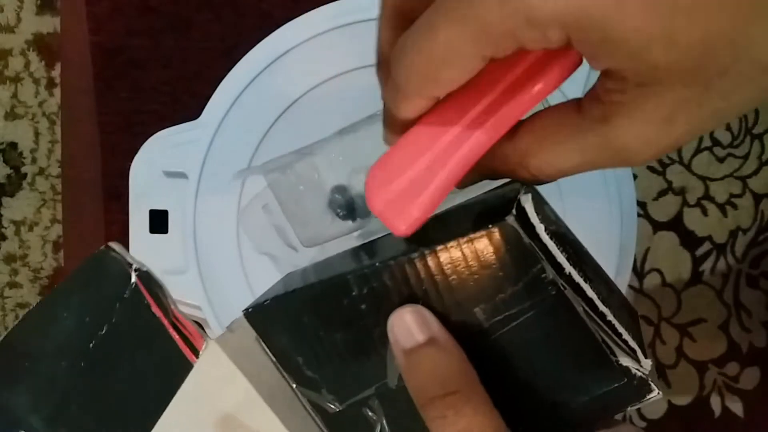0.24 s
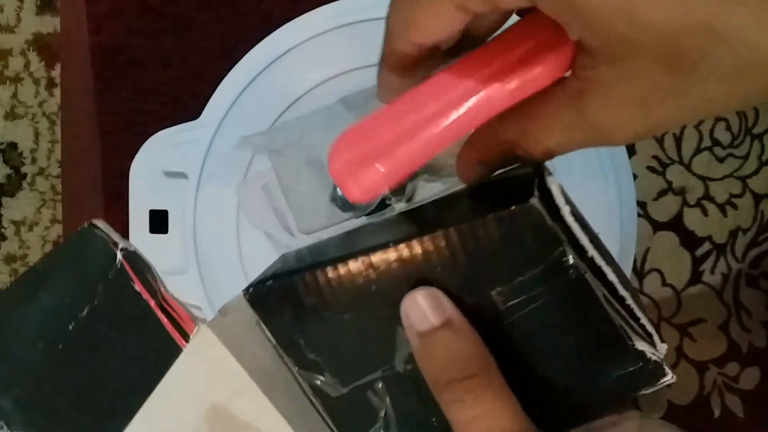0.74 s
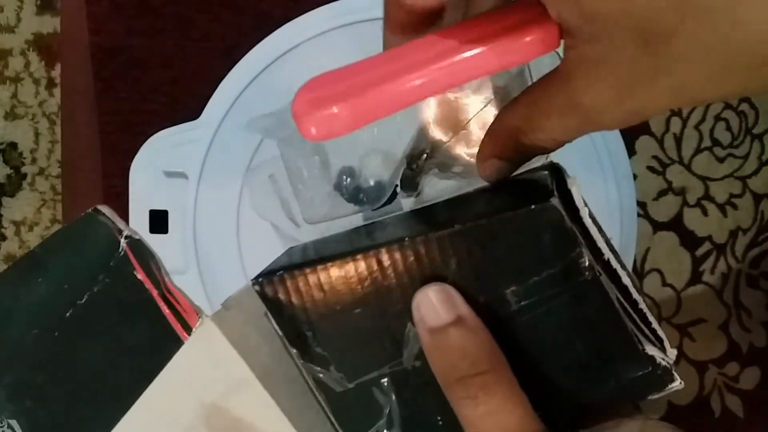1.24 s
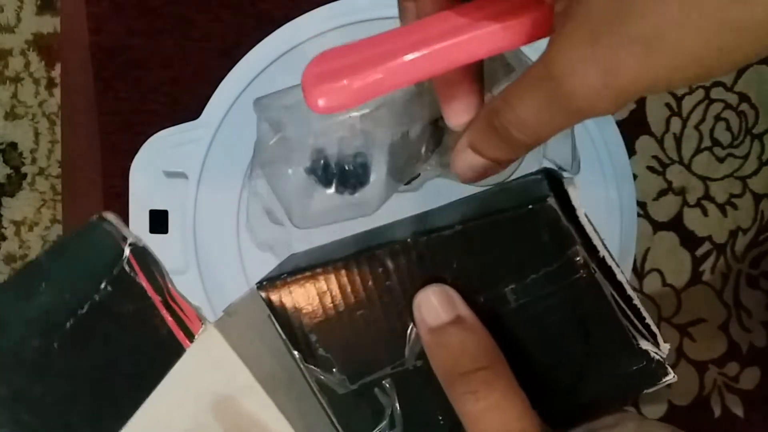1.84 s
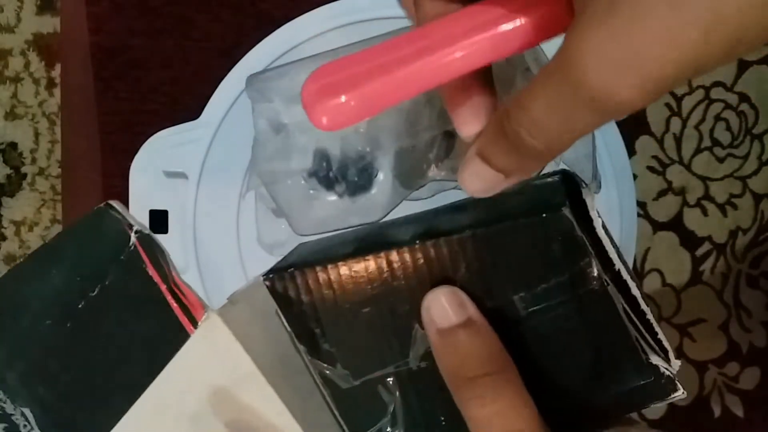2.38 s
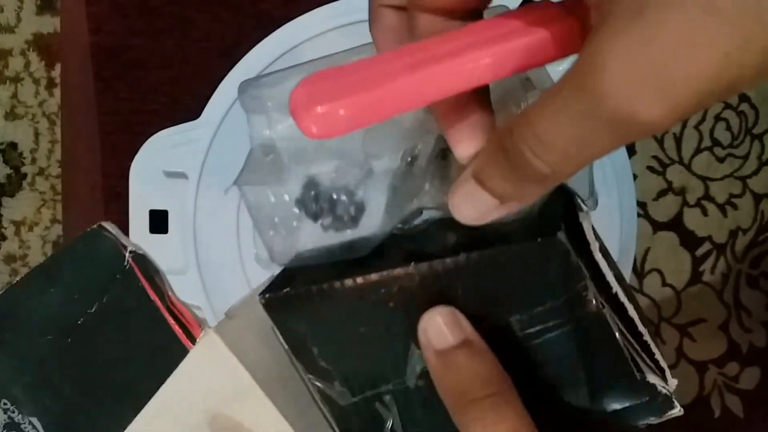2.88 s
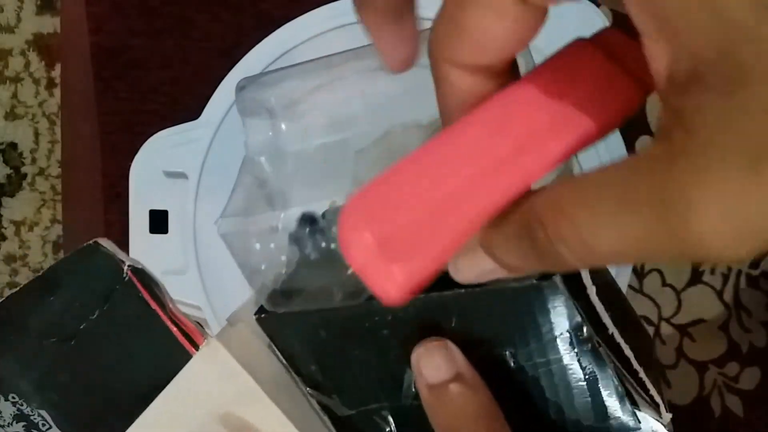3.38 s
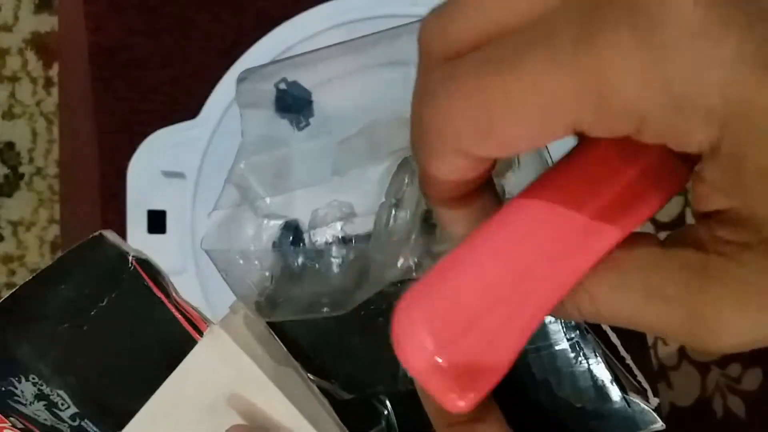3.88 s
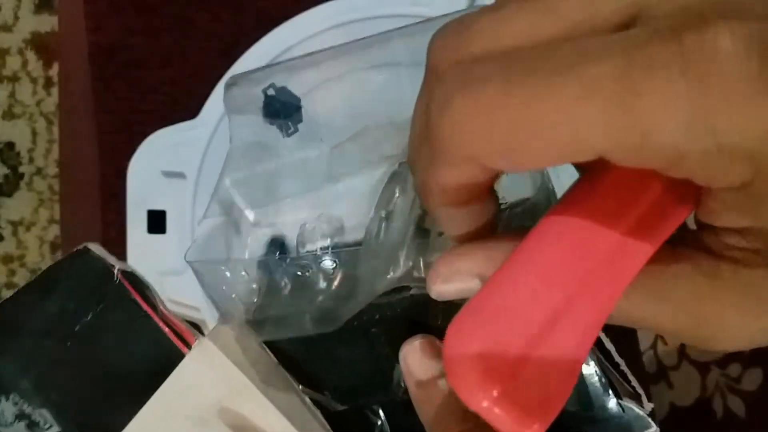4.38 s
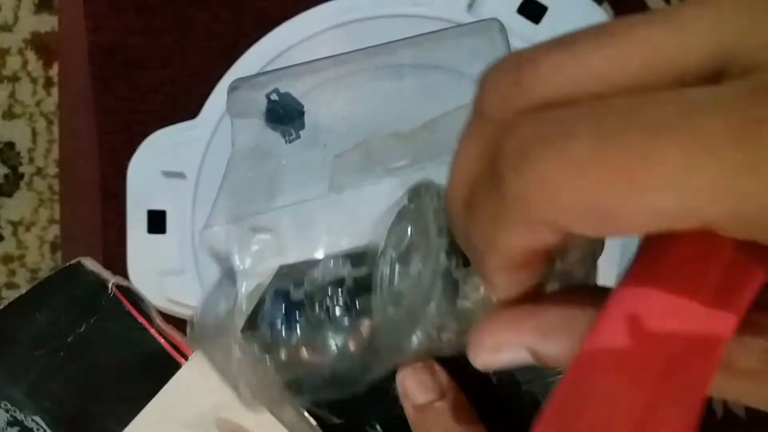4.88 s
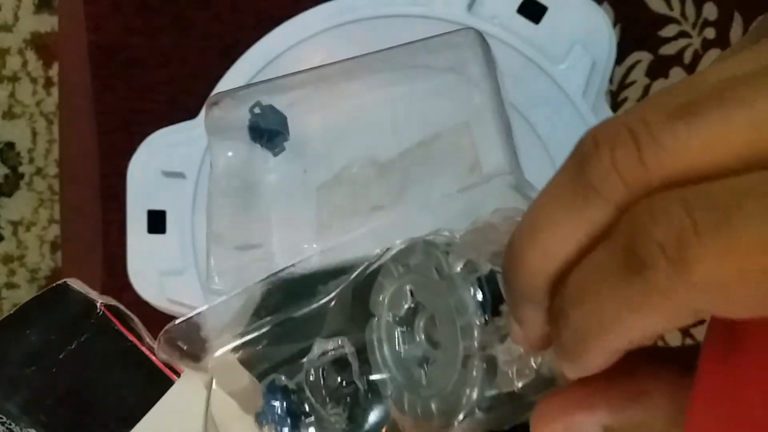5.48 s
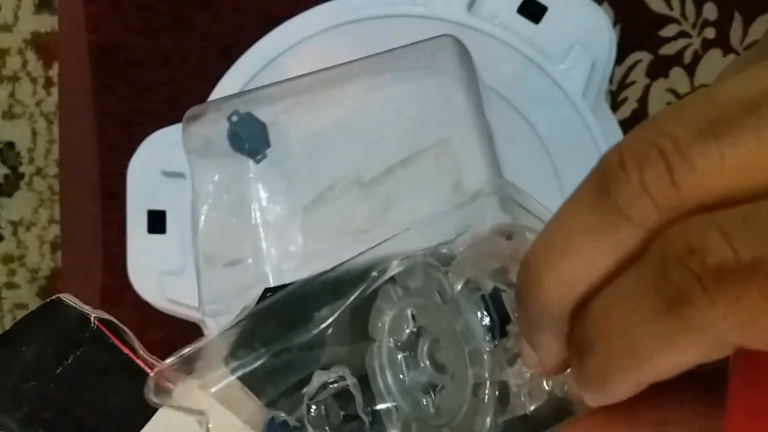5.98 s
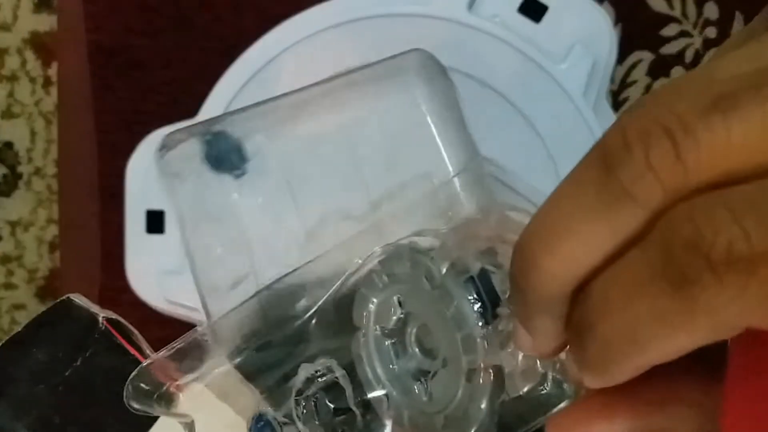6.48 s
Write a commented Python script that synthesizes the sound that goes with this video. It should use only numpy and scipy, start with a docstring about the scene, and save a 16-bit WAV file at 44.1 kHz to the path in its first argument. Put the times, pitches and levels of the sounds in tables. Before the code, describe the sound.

Stiff clear plastic packaging snaps, pops and crackles as hands work it out of a card box, close up in a quiet small room.

```python
"""A thud of the hand on the camera body, then sharp snaps: hands pull a stiff plastic tray from a card box.
Each snap is decaying noise in four registers, with ringing of the tray and a short tail of a small room.
Between snaps filtered grains and noise rub and scratch on card and fingers; bumps and thuds are damped low sines.
The tray is close by, left of the two microphone ports; a quiet rumble and hiss of the room lie underneath."""
import sys
import numpy as np
from scipy import signal
from scipy.fft import rfft, irfft, next_fast_len
from scipy.io import wavfile
from scipy.ndimage import uniform_filter1d, map_coordinates

SR = 44100
rng = np.random.default_rng(int(sys.argv[2]) if len(sys.argv) > 2 else 0)


def unload_wav(signal):
    """Save mono or channel-first audio to the path in sys.argv[1] as 16-bit WAV at rate SR, clipped to [-1, 1]."""
    wavfile.write(
        sys.argv[1],
        SR,
        np.round(np.clip(np.atleast_2d(signal).T, -1, 1) * 32767).astype(np.int16),
    )


N = 297234

# resonances of the tray: (nominal frequency [Hz], relative level [dB], t60 [s])
TRAY_MODES = [(646, -6.5, 0.14), (745, -13, 0.25), (1026, -2, 0.16), (1061.7, 9, 0.047), (1166, 0, 0.098),
              (1204.4, 1.5, 0.067), (1276, -5, .1), (1470, -13, 0.16), (1877, -10.5, .1), (2065, -3, 0.1),
              (2332, -11, 0.12), (2508, -11.5, .15), (3090, -9, .13), (3780, -22.5, 0.13)]


def amp(db):
    """Decibels to amplitude."""
    return 10 ** (np.asarray(db) / 20)


def unit(x):
    """Scale x to an rms of 1."""
    return x / np.sqrt(np.mean(x ** 2) + 1e-20)


def fade(t, t60):
    """Exponential decay that has lost 60 dB at t60."""
    return np.exp(-np.log(1000) * t / t60)


def along(points, hz):
    """Interpolate (frequency [Hz], value) points on a log axis."""
    f, v = np.transpose(points)
    return np.interp(np.log(hz + 1), np.log(f), v)


def curves(rows):
    """One value per sample for each column after the time."""
    s, *cols = np.transpose(rows)
    return [np.interp(np.arange(N) / SR, s, c) for c in cols]


def wobble(rate):
    """A smooth random curve, rate knots a second."""
    knots = rng.standard_normal(int(N * rate / SR) + 4)
    return map_coordinates(knots, [np.arange(N) * rate / SR])


def filtered(x, response):
    """x times a response of frequency."""
    m = next_fast_len(N + SR // 4)
    return irfft(rfft(x, m) * response(np.fft.rfftfreq(m, 1 / SR)), m)[..., :N]


def band(x, low_hz, high_hz):
    """Causal band-pass, kept below half the sample rate."""
    edges = [low_hz, min(high_hz, SR / 2 - 1)]
    return signal.sosfilt(signal.butter(3, edges, "band", fs=SR, output="sos"), x)


def ears(pair, spread):
    """Left and right from a common signal and an unrelated one weighted by spread."""
    common, apart = pair[0], spread * pair[1]
    return np.array([common + apart, common - apart]) / np.hypot(1, spread)


def add(track, s, sound):
    """Mix a sound into the track at time s."""
    part = track[..., max(round(s * SR), 0):][..., :sound.shape[-1]]
    part += sound[..., :part.shape[-1]]


def room_tone(level_db, waver_db):
    """A wavering bed of noise: the rumble is largely alike on both sides, the hiss unrelated."""
    # spectrum of the quiet room: (frequency [Hz], relative level [dB])
    quiet = [(25, -26), (50, -11), (85, -4), (130, -0.5), (180, -9.5), (235, -7), (330, -16), (600, -17.5),
             (1100, -23), (1600, -26), (2600, -27), (4500, -33), (8000, -42), (14000, -31.5)]
    # left-right correlation of the room tone: (frequency [Hz], correlation [-1 to 1])
    likeness = [(40, .6), (130, 1), (500, 0.63), (2000, 0.33), (8000, .1)]

    def mid_side(hz):
        # this angle between mid and side gives the wanted correlation
        turn = np.arccos(np.clip(along(likeness, hz), -1, 1)) / 2
        return amp(along(quiet, hz)) * np.array([np.cos(turn), np.sin(turn)])

    mid, side = filtered(rng.standard_normal((2, N)), mid_side)
    level = amp(level_db + waver_db * wobble(2.93))
    return level * unit(np.array([mid + side, mid - side]))


def handling():
    """The hands shift the box with a soft rumble of low, band-limited noise."""
    # rumble of the box: (time [s], level [dB])
    shifting = [(0, -63.5), (.35, -66.5), (.7, -61.5), (1.3, -58.5), (2.0, -65), (2.6, -74), (3.3, -80.5),
                (6.0, -72.5), (6.7, -68.5)]
    level_db, = curves(shifting)
    rumble = band(ears(rng.standard_normal((2, N)), spread=0.38), 85, 191)
    return amp(level_db) * unit(rumble)


def drag():
    """Strength of rub and scratch over time: the steady grip, plus pulls that swell and let go."""
    # faint rubbing of the fingers that hold the tray: (time [s], level before trim [dB])
    grip = [(0.0, -61.5), (0.49, -69), (0.77, -59), (1.73, -56.5), (2.16, -69.5), (2.5, -61.5), (2.63, -65),
            (3.06, -62), (3.21, -71.5), (3.49, -71), (3.66, -59.5), (4.2, -70.5), (4.54, -62),
            (4.84, -64.5), (5.03, -53), (5.69, -69.5), (6.55, -75), (6.74, -64.5)]
    # pulls over card and skin: (start [s], length [s], rub level [dB], scratch re rub [dB])
    strokes = [(.087, .012, -56, 6.5), (0.216, .08, -61, -9), (0.639, .12, -55, -2),
               (0.802, .05, -54.5, 6.5), (0.997, .06, -56, -2.5), (1.102, .17, -60, -3),
               (1.332, .24, -55, -6), (1.462, .025, -53, -2.5), (1.696, .05, -57.5, -20.5),
               (1.816, .07, -51, -6), (1.937, .025, -54, -8.5), (2.053, .055, -52.5, -7.5),
               (2.267, .03, -52.5, -24), (2.593, .05, -53, -2.5), (2.826, .095, -51, -2),
               (3.05, .085, -53, -8.5), (3.396, .03, -56.5, -6), (3.453, .03, -54, -20),
               (3.598, .04, -47, -9), (3.68, .095, -44, -24), (3.825, .045, -47, -10),
               (4.138, .06, -58.5, 0.5), (4.344, .03, -58.5, 4), (4.421, .065, -48, -5),
               (4.523, .04, -42.5, -0.5), (4.611, .03, -52.5, -3), (4.86, .13, -49, -4.5),
               (4.998, .045, -47, 5), (5.111, .08, -49, -5), (5.92, .045, -63.5, -13),
               (6.028, .075, -51, -10.5), (6.315, .02, -62, -22), (6.565, .05, -56, -19)]
    grip_trim_db, grip_scratch_db = -2.5, -10.5  # scratch is relative to the rub
    swell_power, release_t60_s = 0.66, 0.14
    t = np.arange(N) / SR
    rub = amp(curves(grip)[0] + grip_trim_db)
    scratch = amp(grip_scratch_db) * rub
    for s, length_s, db, scratch_db in strokes:
        swell = np.clip((t - s) / length_s, 0, 1) ** swell_power
        release = fade(np.maximum(t - s - length_s, 0), release_t60_s)
        pull = amp(db) * swell * release
        rub, scratch = np.hypot(rub, pull), np.hypot(scratch, amp(scratch_db) * pull)
    return rub, scratch


def grains(per_s, low_hz, high_hz, cycles, scatter_db):
    """Tiny crinkles at random times: sines of random pitch and size that die within some cycles."""
    count = int(per_s * N / SR)
    when, height, size = rng.random((count, 3)).T[:, :, None]
    hz = low_hz + height * (high_hz - low_hz)
    k = np.arange(SR // 50)
    strength = amp(-scatter_db * np.log(.02 + size))
    ticks = strength * np.sin(2 * np.pi * hz * k / SR) * fade(k / SR, cycles / hz)
    places = (when * N).astype(int) + k
    return np.bincount(places.ravel(), ticks.ravel(), N)[:N]


def friction(spectrum, crinkles, hiss):
    """Crinkles over the smooth hiss of sliding, both coloured by the spectrum, rms 1."""
    colour = lambda hz: amp(along(spectrum, hz))
    smooth = filtered(ears(rng.standard_normal((2, N)), spread=.7), colour)
    return unit(unit(filtered(crinkles, colour)) + hiss * unit(smooth))


def shell(x, boost_db, width_hz, bend):
    """The tray's modes stand out as narrow lines and drift as the fingers bend it; the broad colour is kept."""
    grid = np.arange(0, SR / 2, 4)

    def response(hz, tuning):
        lines = sum(1 / (1 + (2 * (grid - f * tuning) / width_hz) ** 2) for f, _, _ in TRAY_MODES)
        power = 1 + amp(boost_db) ** 2 * lines
        # dividing by the smoothed power keeps the broad colour
        return np.interp(hz, grid, np.sqrt(power / uniform_filter1d(power, size=110)))

    both = lambda hz: np.array([response(hz, 1 - bend), response(hz, 1 + bend)])[:, None]
    slack, taut = filtered(x, both)
    tension = .5 + .5 * np.tanh(2 * wobble(1.7))
    return slack + tension * (taut - slack)


def sliding(rub_strength, scratch_strength):
    """The tray drags over card and fingers: a hollow rub, a crisper scratch and stray ticks where it catches."""
    # colour of the rub: (frequency [Hz], relative level [dB])
    rub_colour = [(90, -34.5), (200, -1.5), (420, -8.5), (700, -7.5), (1100, 1), (1550, -10.5),
                  (2000, -2.5), (2800, -20), (4500, -30)]
    # colour of the scratch: (frequency [Hz], relative level [dB])
    scratch_colour = [(1500, -48.5), (2600, 9), (3400, 3.5), (4700, 3), (6000, -11), (8300, -20),
                      (11000, -7.5), (16000, -25)]
    rub = friction(rub_colour, grains(750, 450, 2600, cycles=20, scatter_db=3.3), hiss=.48)
    scratch = friction(scratch_colour, grains(800, 2200, 7500, cycles=36, scatter_db=4), hiss=.48)
    catches = np.abs(grains(50, 600, 3000, cycles=18, scatter_db=2.5))
    # each catch lets go as a brief, bright surge of the same friction
    ticks = .45 * unit(band(catches * (rub + .7 * scratch), 1000, 4500))
    drawn = rub_strength * (rub + ticks) + scratch_strength * scratch
    return shell(drawn, boost_db=7, width_hz=40, bend=.015)


def bumps(contacts):
    """Soft contacts move a whole body in one low, damped swing that sags in pitch as the pressure eases."""
    out, t = np.zeros(N), np.arange(SR // 3) / SR
    sag = 1 + .42 * fade(t, .06)
    for s, db, hz, t60 in contacts:
        swing = np.sin(2 * np.pi * hz * np.cumsum(sag) / SR)
        soft_onset = 1 - fade(t, 0.014)
        add(out, s, amp(db) * swing * fade(t, t60) * soft_onset)
    return out


def camera_thuds():
    """The hand thuds on the camera body: damped low swings that reach mostly the right port."""
    # thuds: (time [s], level before soft onset [dB], settled pitch [Hz], t60 [s])
    thuds = [(.008, -27, 102, 0.058), (.075, -39.5, 87, 0.15), (2.343, -33, 76, 0.18),
             (2.463, -31.5, 77, .11)]
    left_db = -33
    return np.outer([amp(left_db), 1], bumps(thuds))


def lead_in(length_s):
    """A faint noise swells briefly ahead of each snap: band-limited noise under a reversed decay."""
    t = np.arange(round(length_s * SR)) / SR
    noise = band(ears(rng.standard_normal((2, len(t))), spread=0.86), 600, 3900)
    return unit(noise) * fade(t, 2 * length_s)[::-1]


def registers(db, knock_db, edge_db):
    """Levels of body, knock, edge and fizz: the harder the edge of a snap, the more it fizzes on top."""
    # top of a snap: (edge re body [dB], fizz re body [dB])
    fizz = [(-34, -34.5), (-15, -32.5), (-8.5, -17), (-1.5, -2.5), (5, -0.5)]
    return db + np.array([0, knock_db, edge_db, np.interp(edge_db, *np.transpose(fizz))])


def stutter(count, per_s, depth_db):
    """A buckle runs across the sheet in uneven little jumps: a jagged gain, count samples long."""
    position = np.arange(count) * per_s / SR
    knots = rng.standard_normal(int(position[-1]) + 2)
    return amp(depth_db * map_coordinates(knots, [position], order=1))


def facet(x, pitch_hz, stretch, sharpness, boost_db):
    """The patch of sheet that flips colours the snap with its own unevenly spaced overtones."""
    peaks = 0
    for hz in pitch_hz * (1 + np.arange(len(stretch))) ** 1.2 * stretch:
        resonator = signal.iirpeak(min(hz, 15000), sharpness * np.sqrt(hz / 1000), SR)
        peaks = peaks + signal.lfilter(*resonator, x)
    return x + amp(boost_db) * peaks


def buckle(register_db, t60, pitch_hz, crack, crack_t60):
    """One snap of noise: a hard crack and a flutter of the sheet, the topmost register dying first."""
    # registers in the order body, knock, edge, fizz:
    # (low edge [Hz], high edge [Hz], trim [dB], share of the snap's t60s [ratio])
    register_bands = [(680, 1993, -2.5, 1.46), (200, 890, 2.5, 2.7), (2220, 5290, -0.5, 1.6),
                      (6700, 22900, -1, 1)]
    t = np.arange(SR // 10) / SR
    rise = 1 - fade(t, .002)
    push = np.array([rise * (fade(t, t60 * share) + crack * fade(t, crack_t60 * share))
                     for *_, share in register_bands])
    noise = ears(rng.standard_normal((2, *push.shape)), spread=0.64) * push
    noise = noise * stutter(count=len(t), per_s=700, depth_db=2)
    stretch = np.append(1, rng.uniform(.77, .87, size=3))
    noise = facet(noise, pitch_hz, stretch, sharpness=5.5, boost_db=4)
    out = 0
    for k, (low_hz, high_hz, trim_db, _) in enumerate(register_bands):
        # sqrt(10) turns rms over this 0.1 s into rms as if the energy lay within 10 ms
        register = unit(band(noise[:, k], low_hz, high_hz)) / np.sqrt(10)
        out = out + amp(register_db[k] + trim_db) * register
    return out


def tray_ring():
    """The tray's modes as damped sines, at new strengths for every snap."""
    t = np.arange(SR // 3) / SR
    hz, db, t60 = np.transpose(TRAY_MODES)[:, :, None]
    detune = 1 + 0.0064 * rng.standard_normal(hz.shape)  # the fingers bend the shell slightly out of tune
    phase = rng.uniform(0, 2 * np.pi, hz.shape)
    strength = amp(db + 2 * rng.standard_normal(hz.shape))
    modes = strength * np.sin(2 * np.pi * hz * detune * t + phase) * fade(t, t60)
    return modes.sum(0) * (1 - fade(t, 0.0053))


def room(x):
    """A fresh stereo tail of the walls for the sound x: noise that decays at its own rate in each band."""
    # decay of the room: (frequency [Hz], t60 [s])
    walls = [(150, 0.44), (1000, 0.25), (4000, 0.34), (14000, 0.22)]
    hz, t, z = signal.stft(rng.standard_normal((2, SR // 3)), SR, nperseg=256)
    tail = signal.istft(z * fade(t, along(walls, hz)[:, None]), SR, nperseg=256)[1]
    delay = round(.005 * SR)
    tail = np.pad(ears(tail, spread=0.99), ((0, 0), (delay, 0)))
    return signal.fftconvolve(x, tail / np.linalg.norm(tail[0]), axes=1)


def snaps(ring_db, room_db, lead_in_db):
    """Every buckle; a loosely held sheet flutters longer and sets the tray ringing more."""
    # buckles of the sheet: (time [s], body level before trim [dB], knock re body before trim [dB],
    # edge re body before trim [dB], t60 before the register's share [s], pitch of the facet [Hz])
    buckles = [(.061, -40.5, -4, -11.5, .01, 993), (.112, -41.5, -14.5, -4.5, 0.012, 1053),
               (.214, -48.5, -7.5, -10.5, .04, 1110), (.257, -38, -14.5, -8.5, 0.016, 1007),
               (.436, -38.5, -7, -25, 0.012, 1000), (.452, -45, -8, -11, 0.034, 1030),
               (.503, -46.5, -22, -13.5, 0.022, 1160), (0.6523, -37.5, -12.5, -18, 0.026, 1070),
               (.689, -34.5, -19.5, -24, 0.019, 1130), (.705, -48, -3.5, -6, 0.022, 1084),
               (0.7864, -37, -9.5, -5.5, 0.026, 1110), (.819, -28, -9.5, -7, 0.016, 2260),
               (.825, -34.5, -8, -10.5, 0.042, 1217), (.918, -48, 2, -7.5, 0.031, 590),
               (0.979, -60, -18, 10, 0.016, 2090), (1.0089, -32, -16, 3.5, 0.022, 2550),
               (1.112, -48, -16, -2, 0.024, 1160), (1.141, -38, -10.5, -14.5, 0.013, 1020),
               (1.166, -48.5, -9, -8, .016, 1089), (1.231, -35.5, -21, -4, 0.014, 1430),
               (1.256, -36.5, -14.5, -20, .011, 1020), (1.274, -59.5, -13, -1.5, 0.035, 1050),
               (1.29, -47.5, -6.5, -24, .014, 1050), (1.342, -43.5, -6.5, -3.5, 0.033, 1320),
               (1.459, -30, -18, -3.5, 0.022, 1450), (1.552, -43, -13, -8.5, .022, 1950),
               (1.5595, -39.5, -4, -17.5, .016, 900), (1.598, -18, -23, -17.5, .009, 1100),
               (1.619, -36, -11, -20, .025, 1080), (1.637, -38.5, -5.5, -6.5, 0.014, 1010),
               (1.651, -33, -15, -9, .018, 1000), (1.657, -31, -10, -14, 0.015, 1000),
               (1.6635, -35, 1.5, -10, .018, 700), (1.894, -42, -5, -9.5, 0.046, 1216),
               (2.259, -57.5, 2, 4, 0.039, 2100), (2.2987, -29.5, -2.5, -14, 0.022, 617),
               (2.439, -43, -12.5, -23, 0.0098, 1053), (2.456, -46.5, -5.5, -20, 0.024, 1170),
               (2.537, -31.5, -25, -23, 0.01, 967), (2.568, -48, -0.5, -10, .025, 1000),
               (2.591, -36, 4.5, -13, 0.011, 690), (2.599, -40, -4, -14, 0.035, 1220),
               (2.618, -47.5, 1, -9, .03, 1200), (3.0066, -49.5, -3, 0.5, 0.034, 1110),
               (3.0339, -56, -12, 7.5, 0.023, 2060), (3.094, -47, -10.5, -25, 0.084, 1241),
               (3.458, -51.5, 2.5, -8, .09, 925), (3.607, -36.5, -9.5, -11, 0.016, 680),
               (3.616, -38.5, -4, -16, 0.054, 1050), (3.659, -36, -3.5, -12, 0.025, 1150),
               (3.667, -40.5, -1, -7.5, 0.091, 1300), (3.691, -24.5, -8.5, -30, 0.009, 1130),
               (3.696, -28, -10.5, -35, 0.014, 1160), (3.708, -34, -7, -30, 0.046, 1110),
               (3.7355, -28, -7, -44, 0.013, 950), (3.744, -39, -7.5, -29, .07, 1030),
               (3.764, -43, -4, -8.5, 0.067, 680), (3.802, -37.5, -6, -10.5, 0.047, 725),
               (4.008, -46, -17, -20, 0.013, 1240), (4.145, -51, 0, -33, 0.036, 696),
               (4.211, -46.5, -15, -19, .032, 1230), (4.358, -40.5, -31, -24, 0.034, 1200),
               (4.533, -39.5, -22, -18, 0.25, 1060), (4.7338, -38.5, -19.5, -8.5, 0.042, 1380),
               (4.826, -44.5, -33, -11.5, 0.018, 1140), (5.0495, -27, -13, -8, 0.02, 1060),
               (5.058, -27.5, -21, -3, 0.015, 1000), (5.081, -44, 2, -13, 0.012, 714),
               (5.143, -44, -21.5, -13.5, 0.018, 1533), (5.214, -36, -2, -9, 0.048, 1275),
               (5.424, -37, -5.5, -5, 0.089, 1240), (5.4457, -22.5, -10.5, -4, 0.019, 1150),
               (5.457, -25.5, -15, -5, 0.0034, 1100), (5.4595, -19, -14, -13, 0.035, 1210),
               (5.481, -36, -7.5, -9.5, 0.02, 990), (5.487, -33, -4.5, -11.5, .07, 1050),
               (5.506, -37, -13, -13.5, .04, 2000), (5.5125, -32, -9.5, -11, 0.042, 1120),
               (6.01, -49, -17, -15, 0.11, 2068), (6.105, -48.5, -9, -14, .025, 1090),
               (6.122, -47.5, -30, -10, 0.022, 1110), (6.646, -51.5, -3.5, -7.5, 0.07, 1127),
               (6.721, -37.5, -11.5, -16, 0.26, 1120)]
    out, tails = np.zeros((2, 2, N))
    for s, db, knock_db, edge_db, t60, pitch_hz in buckles:
        snap = buckle(registers(db, knock_db, edge_db), t60, pitch_hz, crack=0.68, crack_t60=0.0065)
        looseness = np.clip(t60 / .06, 0, 1)
        swell = lead_in(length_s=0.041)
        add(out, s - swell.shape[1] / SR, amp(db + lead_in_db) * looseness * swell)
        add(out, s, snap)
        add(out, s, amp(db + ring_db) * looseness * unit(tray_ring()))
        add(tails, s, amp(room_db) * np.sqrt(looseness) * room(snap))
    return out + shell(tails, boost_db=4, width_hz=27, bend=0.0045)


def crinkling(effort, count):
    """Small facets flip at random, more often and louder the harder the sheet is dragged."""
    body_db, scatter_db = -59, 5.5  # at an average drag, before the register trims
    knock_db, edge_db = -9, -10  # re body, before the register trims
    typical_hz, growth = 1200, 0.28  # growth in dB per dB of drag
    out = np.zeros((2, N))
    # evenly shared portions of the work above a light drag hold one flip each
    work = np.cumsum(np.maximum(effort - np.percentile(effort, 25), 0))
    starts = np.searchsorted(work, work[-1] * (np.arange(count) + rng.random(count)) / count)
    force = (effort / effort.mean()) ** growth
    for n, (size, pitch) in zip(starts, rng.standard_normal((count, 2))):
        levels = registers(body_db + scatter_db * size, knock_db, edge_db)
        pitch_hz = typical_hz * np.exp(.25 * pitch)
        flip = buckle(levels, t60=0.024, pitch_hz=pitch_hz, crack=1.0, crack_t60=0.0028)
        add(out, n / SR, force[n] * flip)
    return out


def pings():
    """A crease flips and rings briefly as one damped sine at its own pitch."""
    # creases: (time [s], level before soft onset [dB], pitch [Hz], t60 [s])
    creases = [(1.009, -26, 3300, 0.012), (1.599, -16, 2030, .012), (2.438, -40.5, 2920, 0.019),
               (2.456, -67, 2805, .5), (2.537, -30, 4240, 0.012), (3.007, -33.5, 5640, .014),
               (3.033, -45, 3400, .018), (5.058, -22, 7100, 0.0087), (5.446, -19, 5850, 0.012)]
    out, t = np.zeros(N), np.arange(SR // 4) / SR
    for s, db, hz, t60 in creases:
        add(out, s, amp(db) * np.sin(2 * np.pi * hz * t) * fade(t, t60) * (1 - fade(t, 0.0037)))
    return out


def tray_bumps():
    """Tray and box bump dully: damped low swings."""
    # bumps: (time [s], level before soft onset [dB], settled pitch [Hz], t60 [s])
    contacts = [(1.62, -39.5, 171, 0.17), (1.656, -33.5, 228, 0.12), (1.892, -48.5, 137, 0.15),
                (2.299, -34.5, 130, 0.082), (3.607, -31.5, 181, .12), (3.731, -42.5, 170, 0.21),
                (5.213, -42.5, 176, .22), (5.456, -29, 165, 0.2), (5.46, -45.5, 54.3, 0.16)]
    return bumps(contacts)


def placed(x):
    """The tray is left of the microphones: earlier and louder on that side."""
    # where the tray is held: (time [s], lead of the left ear [ms], left over right [dB])
    place = [(0, 0.054, 3), (.8, 0.097, 4), (1.6, 0.088, 3.5), (2.5, 0.066, 3.5), (3.6, .17, 4.5),
             (5, 0.13, 6), (6.7, 0.14, 5)]
    lead_ms, balance_db = curves(place)
    half = lead_ms * SR / 2000  # half the lead, in samples
    return np.array([amp(side * balance_db / 2) * map_coordinates(ch, [np.arange(N) + side * half], order=5)
                     for ch, side in zip(x, (1, -1))])


def scene():
    """Sounds of tray and box from one place; thuds on the camera; room tone underneath."""
    rub, scratch = drag()
    tray = snaps(ring_db=-16, room_db=-9.0, lead_in_db=-14.0) + pings()
    tray = tray + crinkling(rub, count=70) + sliding(rub, scratch) + tray_bumps()
    return placed(tray + handling()) + camera_thuds() + room_tone(level_db=-61, waver_db=2.0)


def record(dry):
    """The two microphone ports colour the sound a little differently; nothing passes above the band limit."""
    # colour shared by the ports: (frequency [Hz], level [dB])
    microphone = [(3900, -1), (4900, -4.5), (6300, 2.5), (8000, -1.5)]
    # difference of the ports: (frequency [Hz], left over right [dB])
    ports = [(25, -4.5), (70, 0.5), (140, 0), (1000, 1), (2000, 1), (4000, -1.5), (8000, 0.5), (14000, 3.5)]
    top_hz = 16100
    colour_db = lambda hz: along(microphone, hz) + np.outer([.5, -.5], along(ports, hz))
    return filtered(dry, lambda hz: amp(colour_db(hz)) * (hz < top_hz))


dry = scene()
out = record(dry)
unload_wav(out)
```